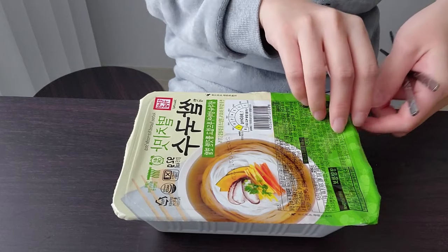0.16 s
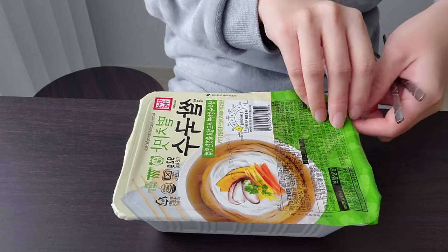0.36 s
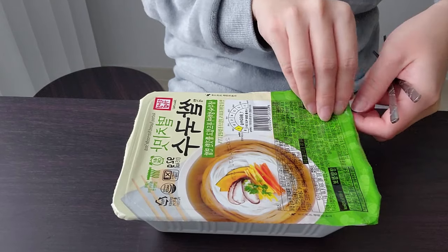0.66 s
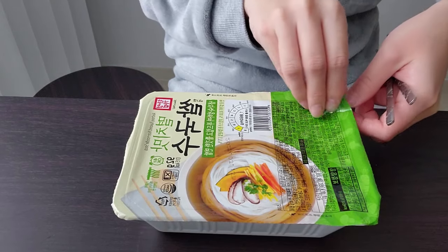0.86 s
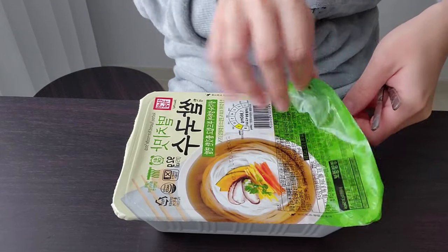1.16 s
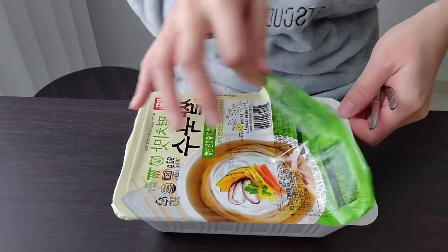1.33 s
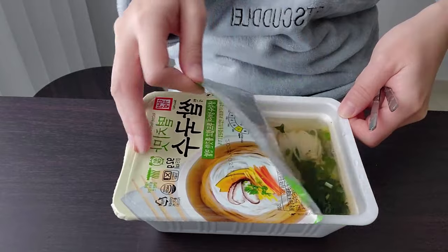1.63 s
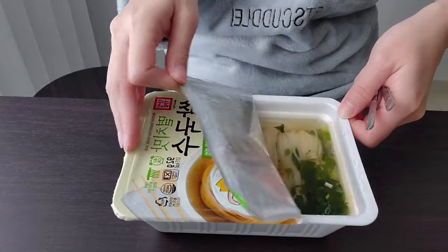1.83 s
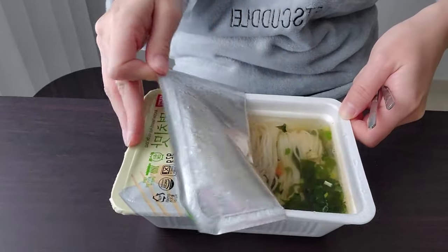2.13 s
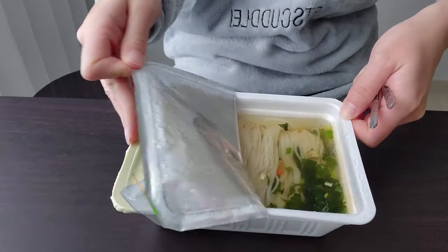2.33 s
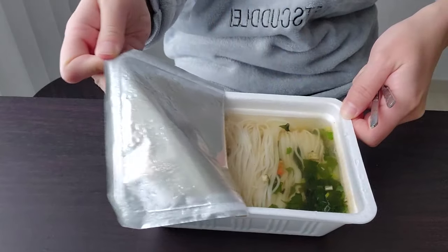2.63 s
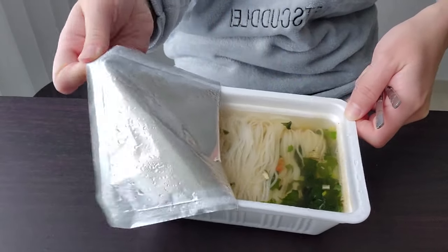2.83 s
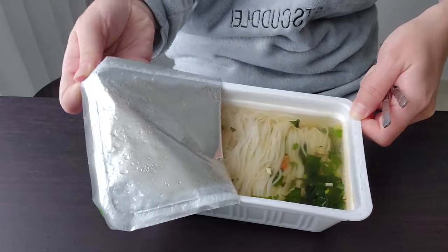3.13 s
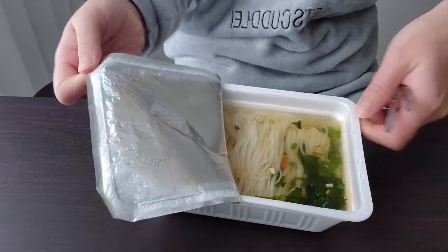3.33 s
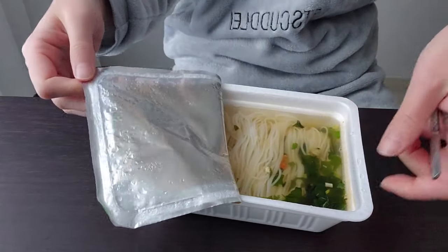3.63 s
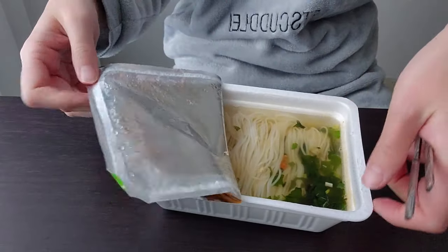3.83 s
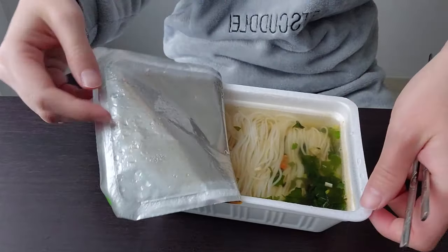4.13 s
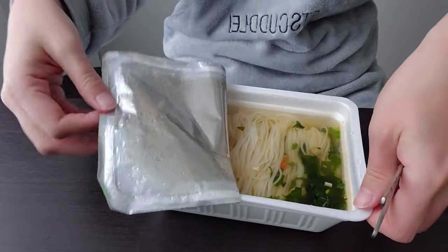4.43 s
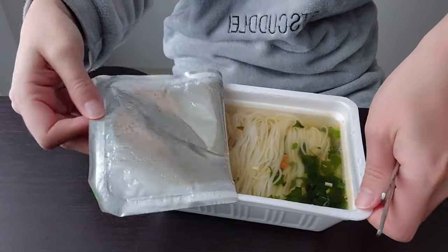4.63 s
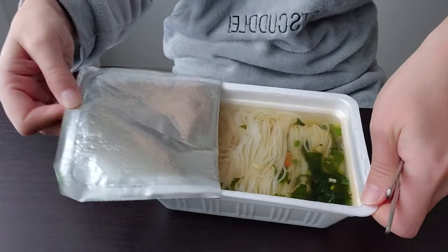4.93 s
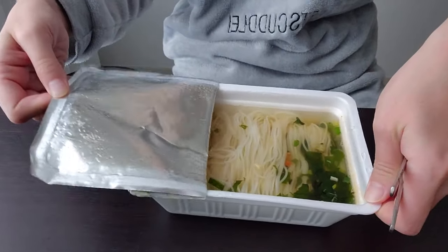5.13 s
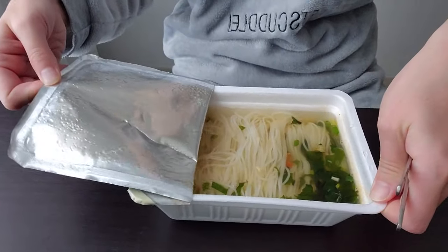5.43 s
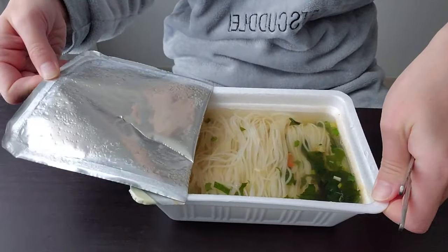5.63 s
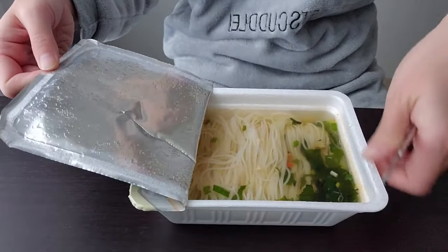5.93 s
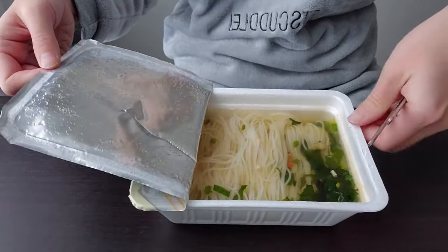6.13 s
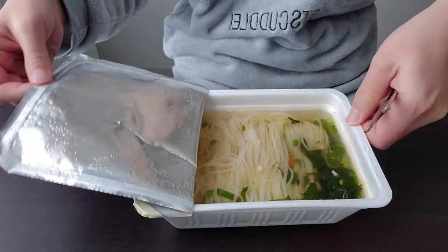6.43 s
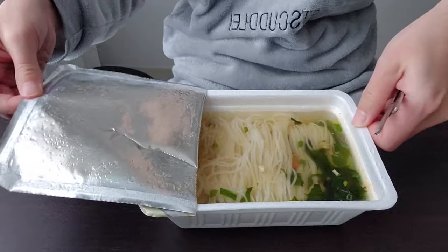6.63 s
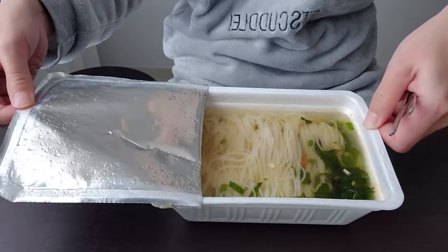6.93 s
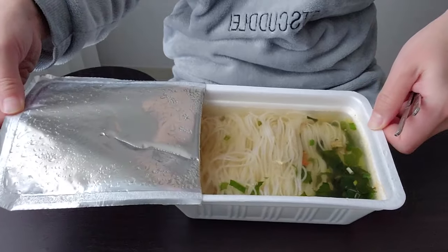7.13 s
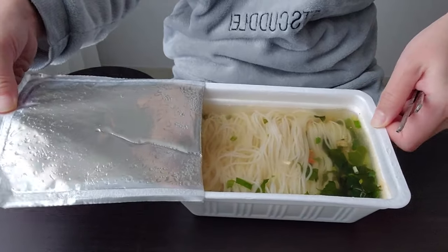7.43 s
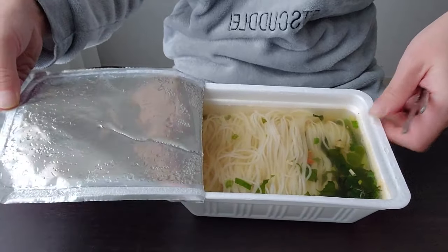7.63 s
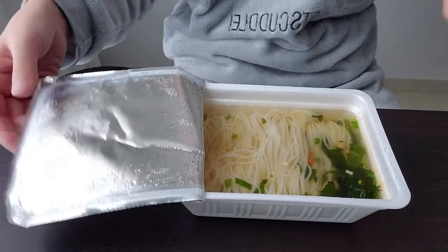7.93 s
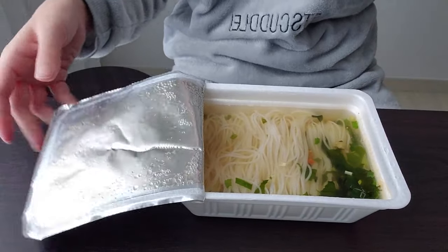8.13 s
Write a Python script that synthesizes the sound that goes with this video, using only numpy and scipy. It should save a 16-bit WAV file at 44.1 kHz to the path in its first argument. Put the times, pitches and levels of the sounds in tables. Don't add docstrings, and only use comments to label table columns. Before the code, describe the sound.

A close, dry stereo pickup in a small quiet room with soft hush and low fridge hum. From 0 to 1.7 s fingers handle a foil lid: sparse small clicks, a crisp one near 0.3, light crinkles around 1.0 to 1.4. From about 1.75 to 3.4 s the lid tears off a plastic tray in rapid jerks, dense crackle with bright sizzle, strongest from 2.2 to 2.85, low table thumps beneath, ending in a quick bright rip near 3.35. A lull holds faint ticks and fingertip bumps until 4.0. Rougher separate tugs run from 4.1 to 5.6, with a very sharp snap at 5.1, fading by 5.9. After near quiet, a third pull crackles from 6.4 to 7.4, loudest at 7.3 with a knock. Small crinkles follow, a snap around 7.65 and a short crisp crackle at 8.26.

```python
import sys
import numpy as np
from scipy import signal
from scipy.fft import rfft, irfft, next_fast_len
from scipy.io import wavfile
from scipy.ndimage import uniform_filter1d

SR = 44100
rng = np.random.default_rng(int(sys.argv[2]) if len(sys.argv) > 2 else 0)


def attenuation_scalar(level_db):
    decades = np.asarray(level_db, float) / 20
    return 10 ** decades


def output_pcm(signal):
    pcm = np.clip(np.atleast_2d(signal).T, -1, 1) * 32767
    wavfile.write(sys.argv[1], SR, np.round(pcm).astype(np.int16))


N = 364602
RIGHT_LAG = 5
SIZZLE_HZ = 8900
CONTROL_STEP = 64


def level(x, db):
    return x * attenuation_scalar(db) / np.sqrt(np.mean(x ** 2))


def peak(x, db):
    return x * attenuation_scalar(db) / np.max(np.abs(x))


def colour(x, points):
    size = next_fast_len(x.shape[-1])
    hz, db = np.transpose(points)
    bins_hz = np.arange(size // 2 + 1) * SR / size
    gain = attenuation_scalar(np.interp(np.log(bins_hz + 1), np.log(hz), db))
    return irfft(rfft(x, size) * gain, size)[..., :x.shape[-1]]


def band(x, lo_hz, hi_hz, order=2):
    sos = signal.butter(order, [lo_hz, min(hi_hz, .45 * SR)], "band", fs=SR, output="sos")
    return signal.sosfilt(sos, x)


def fade(t60, size):
    return np.exp(-np.log(1000) * np.arange(size) / SR / t60)


def ring(modes, size):
    t = np.arange(size) / SR
    return sum(attenuation_scalar(db) * np.sin(2 * np.pi * hz * t) * fade(t60, size) for hz, db, t60 in modes)


def walk(rate):
    hold = int(SR / rate)
    steps = np.repeat(rng.standard_normal(N // hold + 1), hold)
    return uniform_filter1d(steps, hold // 2)[:N]


def curve(rows, column):
    return np.interp(np.arange(N) / SR, np.array(rows)[:, 0], np.array(rows)[:, column])


PATCH_HZ = [330, 600, 950, 1450, 2300, 3300, 5000, 7500, 11000, 15000]
# time [s], strongest resonance [Hz], its strength [dB].
FLAP_SHAPE = [(0, 1480, 0), (1.8, 1630, 4.5), (2.5, 1600, -11), (2.72, 2220, 8), (3.05, 2400, 9.5),
              (3.4, 2400, 7.5), (3.9, 1470, -13), (4.2, 3740, 7), (4.45, 1480, -2), (4.95, 1630, 3),
              (5.2, 2520, 8.5), (6.4, 2660, 7), (7.4, 2540, -1), (7.7, 1530, 4)]
# frequency [Hz], level per Hz [dB].
FOIL_TONE = [(150, -19), (220, 0), (380, -1), (460, -7), (1400, 1), (4300, -3), (8000, -11.5), (10500, -29)]
# time [s], strength [dB].
TAUT_RING = [(0, -20), (4.7, -21), (4.85, -7), (5.5, -1.5), (5.8, -5.5), (8.2, -13.5)]
TAUT_HZ = (5580, 7780)


def seam(per_s=260, scatter_db=2.5, most=3.72, patchy_db=2.0, pan_db=2.3, patch_t60=0.012, even_s=0.11,
         flap_db=-4.5, brighten=0.75, heavy=1.0, rest=0.07, flutter=0.14, thin=.4,
         tears_per_s=25, tear_db=3.5):
    crackle_db, sizzle_db = pull()
    shake_db = 20 * np.log10(shaking())
    slips = walk(60)
    rate = per_s / SR * np.clip(attenuation_scalar(thin * (crackle_db + 50.5)), .3, 1)
    tears = (rng.random(N) < tears_per_s / SR) * attenuation_scalar(tear_db + 0.91 * rng.standard_normal(N))
    tears = tears * np.clip((crackle_db + 62) / 12, 0, 1)
    scatter = scatter_db * np.clip((crackle_db + 85) / 28, .4, 1)

    out = 0
    for patch, hz in enumerate(PATCH_HZ):
        size_db = scatter * np.minimum(rng.exponential(size=N), most)
        size_db = size_db + patchy_db * (slips + 2.1 * walk(30))
        if 4000 < hz < SIZZLE_HZ:
            size_db = size_db + brighten * (sizzle_db + 19.0)
        if hz < 500:
            size_db = size_db + heavy * (shake_db - crackle_db)
        ticks = (rng.random(N) < rate) * attenuation_scalar(size_db)
        if hz > 800:
            ticks = ticks + tears * attenuation_scalar(patchy_db * walk(30))
        unlike = min(0.33 + hz / 4000, .75)
        bent = walk(14) > 0
        for shape in (bent, ~bent):
            near, other = rng.standard_normal((2, 800)) * fade(patch_t60 * (1 + 600 / hz), size=800)
            far = np.sqrt(1 - unlike ** 2) * near + unlike * other
            far = np.roll(far, RIGHT_LAG + patch % 3 - 1)
            rings = band(np.array([near, far]), hz / 1.335, hz * 1.296, order=1)
            rings = level(rings, 0) * np.sqrt(hz)
            out = out + signal.oaconvolve((ticks * shape)[None], rings, axes=1)[:, :N]
    out = out * attenuation_scalar([[pan_db / 2], [-pan_db / 2]])

    crackle = colour(out, FOIL_TONE)
    sizzle = colour(band(out, SIZZLE_HZ, SR, order=3), [(8900, 6.5), (10500, -1.5), (14000, 6.5)])
    flap_hz = curve(FLAP_SHAPE, column=1) * np.exp(flutter * walk(12))
    strength_db = flap_db + curve(FLAP_SHAPE, column=2)
    for hz in (1450, 2080, 2330, 2620, 3300):
        favour = np.exp(-(np.log2(hz / flap_hz) / 0.24) ** 2) + rest * (2000 < hz < 3000)
        gain = attenuation_scalar(strength_db + 4.5 * np.roll(slips, 9 * hz)) * favour
        crackle = crackle + gain * band(crackle, hz / 1.09, hz * 1.08)
    taut = sum(band(crackle, hz / 1.06, hz * 1.06, order=1) for hz in TAUT_HZ)
    crackle = crackle + 2 * attenuation_scalar(curve(TAUT_RING, column=1)) * taut
    crackle, sizzle = evened(crackle, even_s), evened(sizzle, even_s)
    return attenuation_scalar(crackle_db) * (attenuation_scalar(2.5) * crackle + attenuation_scalar(sizzle_db + 2.5) * sizzle)


def evened(x, even_s):
    power = uniform_filter1d(np.mean(x ** 2, axis=0), int(even_s * SR))
    return x / np.sqrt(power + 1e-9)


# time [s], crackle [dB].
CREEP = [(0, -101), (.2, -91), (.5, -68), (.9, -75.5), (1.4, -91), (1.77, -59.5), (2.9, -51.5),
         (3.2, -71.5), (3.72, -81.5), (4.3, -64.5), (5.3, -54.5), (5.7, -76), (6.31, -86), (6.4, -57.5),
         (7.3, -66), (7.5, -76.5), (7.8, -70), (8.15, -83)]


def pull(linger=1.13, creep_sizzle_db=-26):
    shape, db, sizzle_db, _ = jerks(linger)
    points = np.minimum(np.arange(shape.shape[1]) * CONTROL_STEP, N - 1)
    creep = attenuation_scalar(curve(CREEP, column=1)[None, points])
    crackle_db = strongest(np.vstack([shape * attenuation_scalar(db), creep]))
    bright_db = strongest(np.vstack([shape * attenuation_scalar(db + sizzle_db), creep * attenuation_scalar(creep_sizzle_db)]))
    return crackle_db, bright_db - crackle_db


# time [s], crackle [dB], sizzle relative to it [dB],
# table shake [dB], time to swell 20 dB [s]; the next three tables have the same columns.
FIRST_PULL = [(1.866, -43, -9, -67, 0.04), (2.35, -41, -10, -45, 0.04), (1.97, -45, -10, -60, 0.02),
              (1.935, -47, -20, -52.5, 0.08), (2.087, -44, -17, -49.5, 0.11), (2.182, -41, -8.5, -46, 0.05),
              (2.266, -37, -15, -42.5, 0.1029), (2.405, -39, -8.5, -39.5, 0.0625),
              (2.559, -40.5, -12, -39.5, 0.0665), (2.699, -36, -9, -42.5, 0.0955),
              (2.829, -42.5, -1.5, -60, 0.0345), (3.056, -49.5, -11, -51.5, 0.056),
              (3.245, -68, -36, -69, 0.35), (3.277, -42.5, -34, -63, 0.0634),
              (3.306, -47.5, -9.5, -73, 0.0064), (3.336, -39.5, -3.5, -64, -0.08),
              (3.357, -41.5, -8, -68, -0.12), (2.932, -48.5, -2, -58, -0.05), (2.765, -50, -21, -60, 0.11)]
# [s, dB, dB, dB, s].
SECOND_PULL = [
    (4.089, -49, -11, -64, 0.04),
    (4.213, -52.5, -6.5, -83, 0.055),
    (4.375, -43, -22, -49.5, 0.045),
    (4.49, -48, -35, -48, 0.028),
    (4.633, -41, -11, -68, 0.038),
    (4.842, -42.5, -9.5, -43.5, 0.14),
    (4.99, -41.5, -10.5, -44.5, 0.3),
    (5.119, -46, -17.5, -44, 0.23),
    (5.455, -44.5, -12.5, -45.5, 0.14),
    (5.861, -54, -13.5, -51.5, 0.037),
]
# [s, dB, dB, dB, s].
THIRD_PULL = [
    (6.348, -59, -16, -55.5, 0.034),
    (6.481, -44, -3.5, -52, 0.062),
    (6.528, -47.5, -7, -40.5, 0.036),
    (6.702, -46.5, -11, -55, 0.096),
    (6.851, -40, -7.5, -44, 0.061),
    (7.031, -49.5, -6.5, -58, 0.11),
    (7.125, -42, -8.5, -43, 0.063),
    (7.313, -36.5, -9.5, -42.5, 0.053),
    (7.637, -55.5, -14, -55, 0.12),
]
# [s, dB, dB, dB, s].
FINGERING = [(0.083, -50.5, -46, -70, 0.024), (0.132, -67, -45, -58, 0.021),
             (0.305, -59.5, -35, -66.5, 0.21), (.645, -78, -23, -84, 0.049), (0.86, -61, -28, -89, 0.014),
             (1.014, -51.5, -48, -85, 0.039), (1.159, -62, -36, -69, 0.078),
             (1.274, -61.5, -45, -66.5, 0.031), (1.372, -52, -44, -55, 0.029), (1.6, -71, -24, -66.5, 0.15),
             (3.512, -66, -41, -65, 0.03), (3.787, -56, -36, -61, 0.015), (3.873, -53.5, -23, -63, 0.073),
             (6.161, -69.5, -23, -81, 0.03), (6.222, -65.5, -26, -87.5, 0.053),
             (7.563, -50.5, -45, -80, 0.024), (7.921, -68, -33, -57, 0.11), (8.199, -61.5, -24, -74, 0.043),
             (8.262, -38.5, -17, -80, 0.0075)]


def jerks(linger):
    rows = np.array(FIRST_PULL + SECOND_PULL + THIRD_PULL + FINGERING)
    s, db, sizzle_db, shake_db, swell_s = rows.T[:, :, None]
    late = (np.arange(0, N + CONTROL_STEP, CONTROL_STEP) / SR - s) / np.maximum(swell_s, .01)
    return attenuation_scalar(20 * np.minimum(late, -late / linger)), db, sizzle_db, shake_db


def strongest(gains):
    db = 10 * np.log10(np.sum(gains ** 2, axis=0) + 1e-18)
    return np.interp(np.arange(N), np.arange(gains.shape[1]) * CONTROL_STEP, db)


# time [s], peak [dB], foil pitch [Hz], sharp edge [dB]
TICKS = [(.5055, -50, 3170, -25), (.2996, -21, 1503, -13), (.6142, -49, 1470, -25),
         (1.2822, -44, 1390, -40), (.9556, -39, 2600, -7), (1.0091, -31, 1760, -30),
         (.0785, -23.5, 1190, -40), (1.5863, -47.5, 1280, -34), (1.8194, -34, 7400, -8),
         (2.4979, -28.5, 2660, -6), (2.7328, -41, 1630, -20), (2.9807, -38, 2040, -6),
         (3.0451, -32, 2120, -1), (4.4255, -34.5, 1510, -52), (4.5712, -47, 5170, -6),
         (4.636, -24.5, 5620, -16), (4.7033, -43.5, 2520, -6.5), (5.063, -35, 2150, -11),
         (5.2729, -42, 2400, -20.5), (6.4598, -33.5, 7700, -12), (6.4784, -39.5, 2770, -12),
         (6.5149, -34, 2220, 0), (6.5912, -29.5, 7420, -6), (6.811, -45.5, 2300, -9),
         (7.0077, -37.5, 2820, 1.5), (7.2773, -28, 2150, -31), (7.5595, -33, 4530, -26),
         (7.774, -37.5, 5170, -14), (7.9733, -50, 2930, -27), (8.199, -44.5, 3200, -3.5)]
# [s, dB, Hz, dB].
CRACKS = [(.424, -38, 1270, -56), (.6345, -34, 2850, -13), (1.2592, -32.5, 1484, -27),
          (1.3597, -25, 3000, -22), (1.3846, -41.5, 2440, -42), (1.7803, -35, 2700, -32),
          (1.96, -33.5, 3840, -14), (2.003, -28.5, 1530, -50), (2.2282, -30, 4160, -10),
          (2.429, -45, 4070, -23), (3.4976, -37, 1550, -22), (3.7824, -39.5, 2340, -31),
          (3.8917, -39, 3540, -32), (4.0802, -34.5, 3800, -37), (4.218, -38.5, 3540, -33),
          (4.3731, -35, 3360, -9.5), (4.4791, -30, 1480, -5.5), (4.7552, -34.5, 2000, -9),
          (5.0243, -30, 4260, -6), (5.0765, -37, 2230, -2), (5.8604, -43.5, 3150, -4.5),
          (6.4165, -49, 1166, -40), (6.6683, -43, 4340, -1.5), (6.8345, -39, 2450, 0.5),
          (6.8494, -32, 4400, -9), (7.0638, -34.5, 2700, -6), (7.1313, -41, 4620, -20),
          (7.6344, -27, 1540, -14), (7.686, -28, 5200, -19), (7.8855, -42.5, 4300, -8)]
# [s, dB, Hz, dB].
CRUNCHES = [(.0725, -33, 2700, -49), (.2749, -38.5, 2010, -16.5), (1.146, -40.5, 2630, -14),
            (1.74, -40, 2200, -17), (1.8482, -30, 6200, -4), (2.0761, -47, 2150, -24),
            (2.1598, -32, 3420, -5), (2.184, -41.5, 3320, -15.5), (2.2534, -33.5, 2280, -27.5),
            (2.3956, -29.5, 1430, -18), (2.5464, -35.5, 2180, -9), (2.5627, -37.5, 2260, -24),
            (2.6959, -32.5, 5600, -8), (3.2375, -44.5, 1490, -39), (3.3335, -48, 2400, -8),
            (3.8368, -42, 1370, -52), (4.1474, -44, 1320, -13), (.247, -48, 1890, -11),
            (4.8521, -33, 3270, -6), (4.941, -39, 1260, -26), (4.974, -34, 1110, -22.5),
            (5.1125, -19.5, 4240, -13), (5.386, -42, 2680, -7), (5.4446, -34, 4300, -4),
            (6.5212, -41, 2470, -8), (6.7013, -54, 4800, -12), (7.318, -29.5, 5900, -27),
            (7.6243, -36.5, 1700, -11.5), (8.1659, -48.5, 1955, -37), (8.2458, -35, 5340, -22)]
# [s, dB, Hz,
# dB].
NICKS = [(1.7268, -39, 2830, -14), (1.934, -30.5, 2210, -2), (2.049, -32, 1440, -28),
         (2.0888, -30.5, 1070, -4), (2.3155, -40, 1230, -11), (2.3288, -23, 4400, -13),
         (2.343, -22.5, 1600, -5), (2.476, -42, 2940, -21), (2.635, -30, 1940, -8), (2.6628, -33, 1220, -9),
         (2.6891, -21.5, 1450, -5), (2.7522, -39, 2180, -13), (2.8, -38, 2170, 2), (2.822, -32, 2150, -9),
         (2.8718, -35.5, 2030, -1.5), (2.9008, -45, 2250, -3), (2.9234, -51, 2240, -11),
         (2.9427, -36, 2430, -3), (3.002, -36.5, 1620, -14), (3.267, -33, 2250, -11),
         (3.3305, -35, 2180, -7), (3.3493, -32, 2300, -7), (3.917, -36, 1580, -19),
         (4.0651, -36.5, 1440, -20), (4.1867, -40, 3230, -3), (4.5266, -42, 1570, -19),
         (4.5945, -43.5, 2310, 3), (4.6169, -32.5, 1510, -4), (4.815, -29, 1670, -13),
         (4.8246, -24, 1660, -22), (4.8775, -24.5, 5340, -7), (4.96, -30, 980, -11),
         (5.0085, -37, 2200, -13), (5.253, -36, 2020, -7), (5.3564, -39, 2300, 0), (5.4296, -33, 2390, -8),
         (5.5261, -49, 2480, -14), (5.5628, -44, 2800, -3), (5.5962, -50, 2390, -3),
         (6.6202, -35, 2520, -2), (6.6368, -38, 2240, -11), (6.73, -37, 2220, 1), (6.9062, -36, 4200, -11),
         (6.966, -40, 2170, -13), (7.1057, -37, 2270, -14), (7.1674, -52, 2190, -9),
         (7.2105, -44, 3280, -9), (7.2472, -44, 3280, -7), (7.2634, -37.5, 2150, -3),
         (7.415, -45.5, 2140, -27),
         (0.085, -33, 1310, -27), (0.099, -39, 1050, -22), (0.329, -58, 1550, -19),
          (0.354, -48, 2090, -20), (0.39, -41.5, 1000, -28), (0.436, -46, 1050, -22),
          (0.547, -48.5, 1110, -12), (0.737, -56, 2150, -22), (0.86, -49, 1180, -20),
          (1.029, -53, 1440, -22), (1.545, -53, 1800, -19), (1.609, -46.5, 1400, -8),
          (2.019, -36, 1320, -28), (2.414, -34, 1130, -22), (3.052, -33, 2600, -22),
          (3.065, -36.5, 2330, -17), (3.089, -58, 2650, -20), (3.839, -42, 1380, -24),
          (3.966, -47.5, 3660, -22), (4.028, -47, 3430, -22), (4.051, -50, 1460, -22),
          (4.306, -49, 3280, -22), (5.1102, -15.5, 4400, -19), (5.121, -20, 2090, -21.5),
          (6.153, -51.5, 2070, -24.5), (6.213, -51, 2090, -25), (6.329, -54, 4670, -16),
          (7.532, -46, 1100, -29), (7.649, -49, 2240, -22), (8.219, -60, 5420, -24),
         (0.8094, -57, 5910, -16), (0.9367, -46, 1480, -9), (0.9948, -38, 1200, -23),
          (1.175, -52, 1930, -16), (1.1967, -47.5, 2200, -21), (1.2447, -47, 1580, -29),
          (1.346, -45, 1500, -30), (0.6365, -30, 1450, -25), (2.1875, -27, 2400, -8),
          (2.357, -28, 3300, -10), (3.9799, -50, 1400, -13), (6.5813, -40, 2550, -16),
          (7.2863, -39, 2330, -18), (7.3624, -45, 1640, -14), (7.9835, -47, 1410, -18),
          (8.1675, -44, 1560, -22), (8.2624, -32.5, 1290, -16)]
# frequency [Hz], level [dB], t60 [s].
TRAY_MODES = [(363, 1.5, 0.094), (718, -4.5, 0.086), (1156, -3, 0.2), (1480, 1.5, 0.12), (2150, -0.5, 0.16),
              (2870, -12.5, 0.22)]


def creases(foil_width=0.72, wide_db=-1.5, tray_db=-17.5, edge_db=7.5, body_db=-26.5, gain_db=3.8, far_db=4,
            gripped=0.75, facet_db=-5, facet_t60=0.015, spread=0.548, dull=0.43, small_db=-7.5):
    size = 2048
    out = np.zeros((2, N + size))
    t = np.arange(size) / SR
    click = (t == 0).astype(float)
    wide = band(click, 815, 0.8 * SIZZLE_HZ, 6)
    body = band(click, 282, 1000, 2)
    edge = band(click, SIZZLE_HZ, SR, 3)
    lead_s, lead_db, lead_grow_s = .008, -26, .002
    lead_in = attenuation_scalar(lead_db) * np.exp(-np.abs(t - lead_s) / lead_grow_s)
    small = [(s, db + small_db, hz, sharp_db) for s, db, hz, sharp_db in NICKS]
    kinds = ((TICKS, 1.0), (CRACKS, 1.6), (CRUNCHES, 3.8), (small, 1.5))

    for s, db, hz, sharp_db, burst_ms in [(*row, ms) for rows, ms in kinds for row in rows]:
        pan_db = 1.6 + 1.6 * rng.standard_normal()
        push = np.maximum(t - lead_s, 0) * 1000 / burst_ms
        swell = push ** 1.44 * np.exp(-1.5 * push) + lead_in
        near, other = rng.standard_normal((2, size))
        burst = np.array([near, 0.56 * near + 0.57 * other]) * near[::-1] ** 2 * swell
        spectrum = rfft(burst, 2 * size)

        def through(response):
            return irfft(spectrum * rfft(response, 2 * size))[:, :size]

        foil = peak(band(burst, hz * (1 - foil_width / 2), hz * (1 + foil_width / 2)), 0)
        held = []
        for mode_hz, mode_db, t60 in TRAY_MODES:
            bend, hold = rng.standard_normal(2)
            away_db = far_db * abs(np.log2(mode_hz / min(hz, 2400)))
            held_db = mode_db + np.clip(10.0 * hold, -9, 5) - away_db
            held.append((mode_hz * (1 + 0.081 * bend), held_db, t60 * gripped))
        octaves = np.log2(hz / 1500)
        snap = foil + peak(through(wide), wide_db + dull * min(sharp_db + 14, 0))
        snap = snap + peak(through(ring(held, size)), tray_db - 6.3 * octaves)
        facet_hz = np.minimum(hz * np.exp(.3 + spread * rng.standard_normal(9)), SIZZLE_HZ)
        facets = [(f, 6.7 * rng.standard_normal() - 40 * (f >= SIZZLE_HZ), facet_t60) for f in facet_hz]
        snap = snap + peak(through(ring(facets, size=768)), facet_db)
        snap = snap + peak(through(body), body_db - 7.2 * octaves)
        snap = band(snap, 150, SIZZLE_HZ) + peak(through(edge), sharp_db + edge_db)
        lags = 0, int(RIGHT_LAG + 6 * (rng.random() - .5))
        for ear, side in enumerate((1, -1)):
            at = int((s - lead_s) * SR) + lags[ear]
            out[ear, at:at + size] += snap[ear] * attenuation_scalar(db + gain_db + side * pan_db / 2)
    return out[:, :N]


# time [s], peak [dB], pitch [Hz].
SCUFFS = [(0.09, -48, 960), (0.505, -57.5, 358), (0.539, -65.5, 324), (4.279, -52, 1030), (4.38, -48, 760),
          (4.476, -45, 810), (7.31, -49, 770), (8.25, -51, 1100), (7.399, -54, 273), (7.648, -49, 534),
          (7.894, -49, 930), (8.02, -57, 890), (3.893, -58, 760), (3.92, -59, 760), (4.526, -54, 800),
          (3.5, -58, 800), (3.062, -57, 780), (4.15, -56, 1150)]


def scuffs(soft_s=0.005, gain_db=8.5):
    size = 4096
    out = np.zeros(N + size)
    push = np.arange(size) / SR / soft_s
    for s, db, hz in SCUFFS:
        puff = band(rng.standard_normal(size) * push * np.exp(-push), hz / 1.58, hz * 1.28)
        at = int(s * SR)
        out[at:at + size] += peak(puff, db + gain_db)
    return np.array([out[:N], 0.58 * np.roll(out[:N], RIGHT_LAG)])


# time [s], peak [dB].
TUGS = [(2.077, -40.5), (2.247, -35), (2.352, -29), (2.513, -29.5), (4.474, -34), (4.625, -35.5),
        (4.969, -30.5), (6.529, -36), (2.69, -40), (4.79, -35), (5.441, -45), (6.872, -30.5),
        (7.114, -33.5), (7.327, -26.5)]
# frequency [Hz], level [dB], t60 [s].
TABLE_MODES = [(101.7, -6, 0.12), (55, -37, 0.14), (125, -11.5, 0.04), (198, -17, 0.04), (290, -24, 0.03)]


def table(push_s=0.0025, shake_db=0.0, tug_db=-4.5):
    modes = band(ring(TABLE_MODES, size=16384), 62, 820, order=3)
    rubbing = rng.standard_normal(N) * attenuation_scalar(3.4 * walk(30))
    shake = level(signal.fftconvolve(rubbing, modes)[:N], shake_db) * shaking()
    knocks = np.zeros(N)
    s, db = np.transpose(TUGS)
    knocks[(s * SR).astype(int)] = attenuation_scalar(db + tug_db)
    soft = peak(np.convolve(np.hanning(int(2 * push_s * SR)), modes), 0)
    boom = shake + signal.fftconvolve(knocks, soft)[:N]
    return np.array([boom, np.roll(boom, 12)]) * attenuation_scalar(0) * np.array(attenuation_scalar([[.7], [-.7]]))


def shaking(linger=1.13, slower=1.54, still_db=-80):
    shape, _, _, shake_db = jerks(linger)
    return attenuation_scalar(strongest(shape ** (1 / slower) * attenuation_scalar(shake_db))) + attenuation_scalar(still_db)


def room(x, gain_db=-12.5, t60=0.25, treble_t60=0.05, corner_hz=2200):
    noise = rng.standard_normal((2, 16384))
    dull = band(noise, 130, corner_hz)
    tail = dull * fade(t60, size=16384) + (noise - dull) * fade(treble_t60, size=16384)
    tail = np.pad(tail, ((0, 0), (180, 0)))
    tail = tail / np.sqrt(np.sum(tail ** 2) / 2)
    return attenuation_scalar(gain_db) * signal.fftconvolve(x, tail, axes=1)[:, :N]


# frequency [Hz], level per Hz [dB].
AIR_TONE = [(12, -32), (20, -2), (55, 3.5), (86, -19.5), (107, 3.5), (127, 0.5), (168, -19), (377, -14),
            (459, -16), (1440, -26), (16000, -58.5)]
# frequency [Hz], level [dB], width [Hz].
FRIDGE_HUM = [(50.7, -76.5, 8.1), (120.7, -75, 9.7)]


def air(hush_db=-72.5):
    mid, side = rng.standard_normal((2, N))
    side = band(side, 300, 18000, order=1) + 1.4 * side
    hush = level(colour(np.array([mid + side, mid - side]), AIR_TONE), hush_db)
    hush = hush + level(band(rng.standard_normal((2, N)), 1500, 6100), -82.5)
    hum = sum(level(band(mid, hz - wide / 2, hz + wide / 2), db) for hz, db, wide in FRIDGE_HUM)
    return hush + hum


def scene():
    foil = seam() + creases() + scuffs()
    return foil + room(foil) + table() + air()


def band_limit(x):
    return signal.sosfilt(signal.butter(12, 16830, fs=SR, output="sos"), x)


def record(dry, ceiling=0.15, top_hz=15900):
    rounded = ceiling * np.tanh(dry / ceiling)
    top_cut = signal.ellip(8, .3, 70, top_hz, fs=SR, output="sos")
    return band_limit(signal.sosfilt(top_cut, rounded))


dry = scene()
out = record(dry)
output_pcm(out)
```